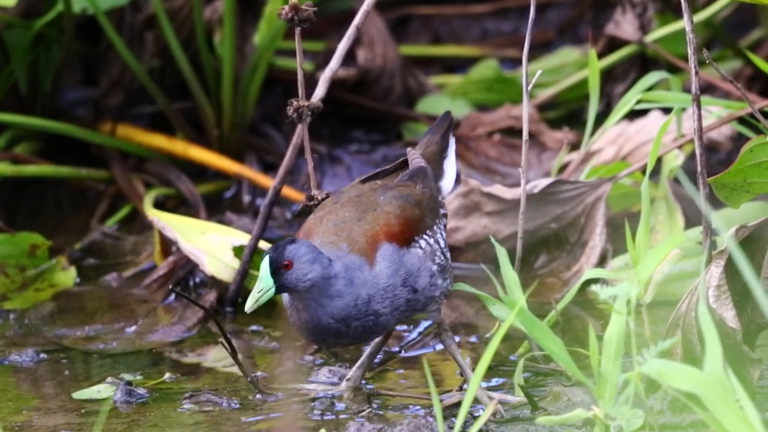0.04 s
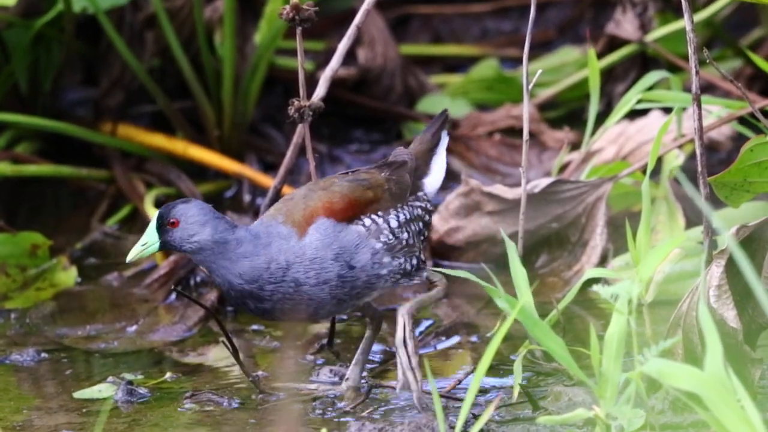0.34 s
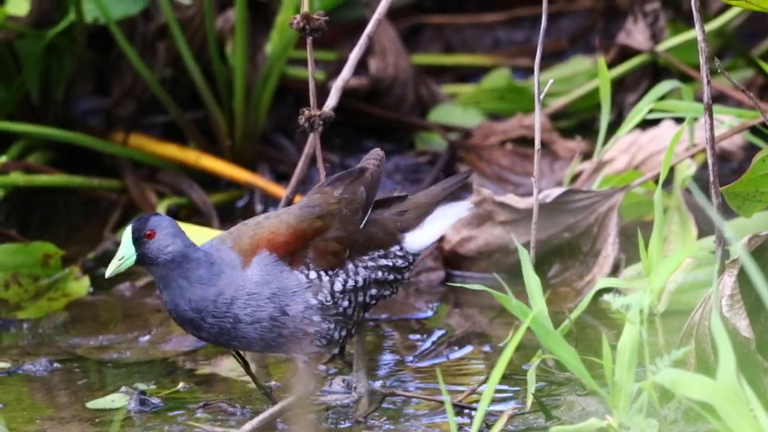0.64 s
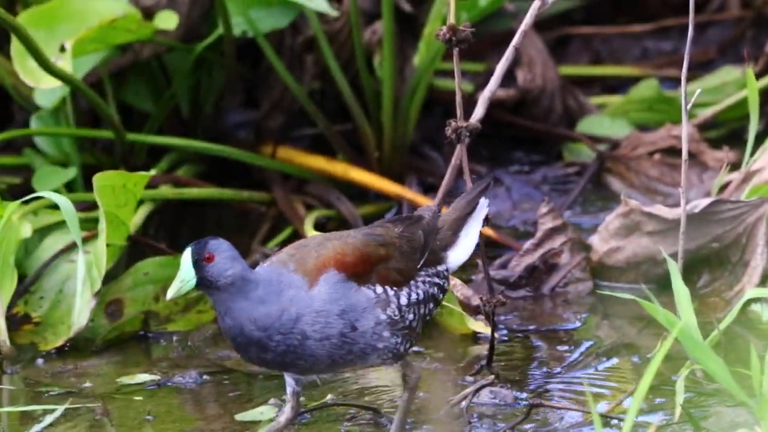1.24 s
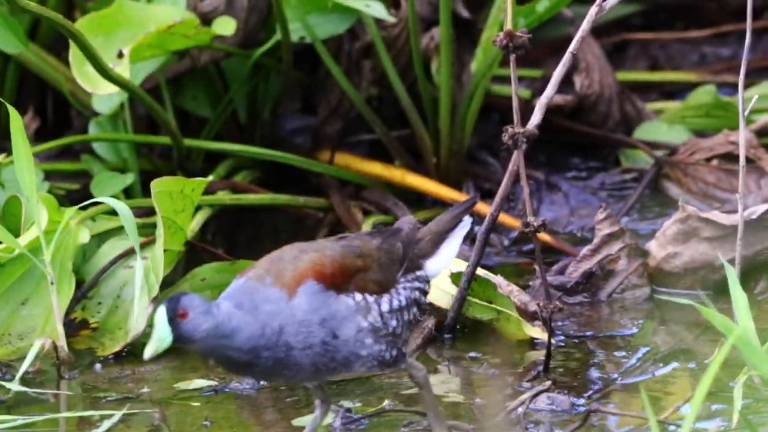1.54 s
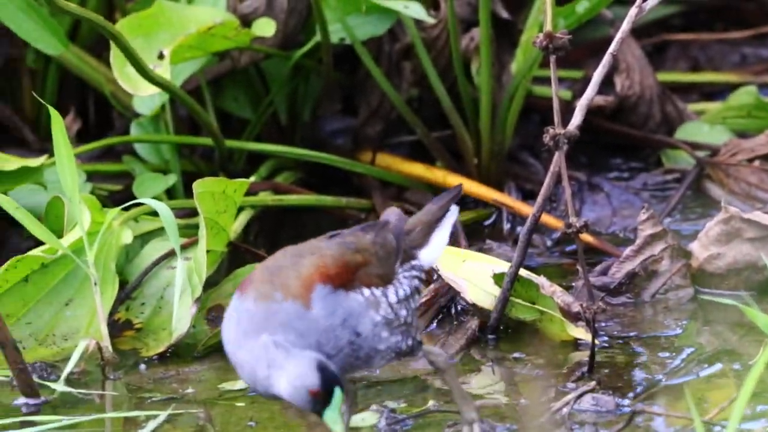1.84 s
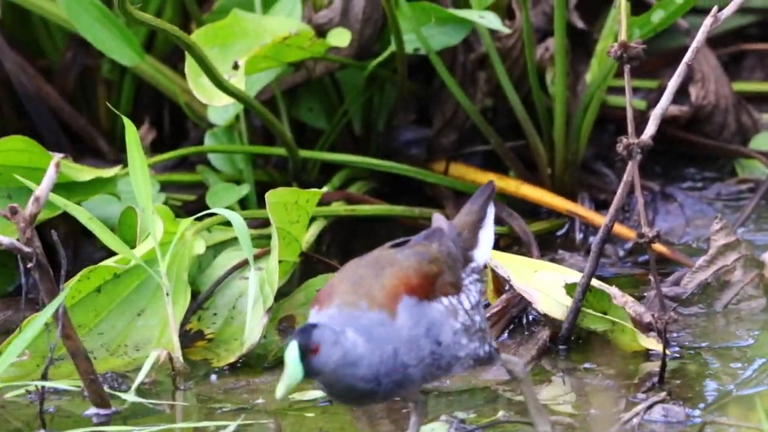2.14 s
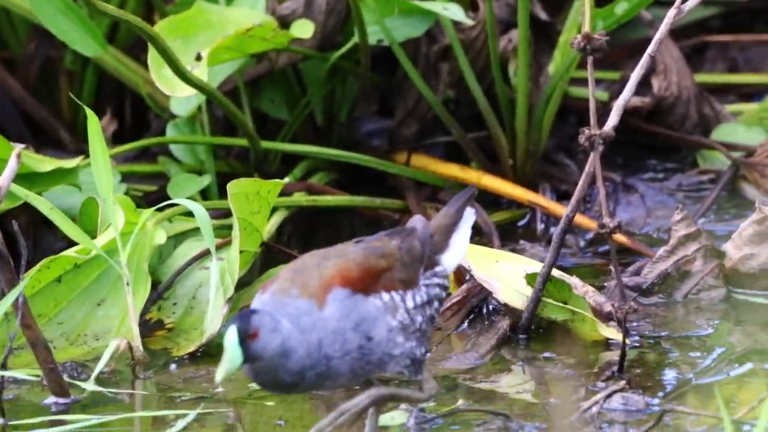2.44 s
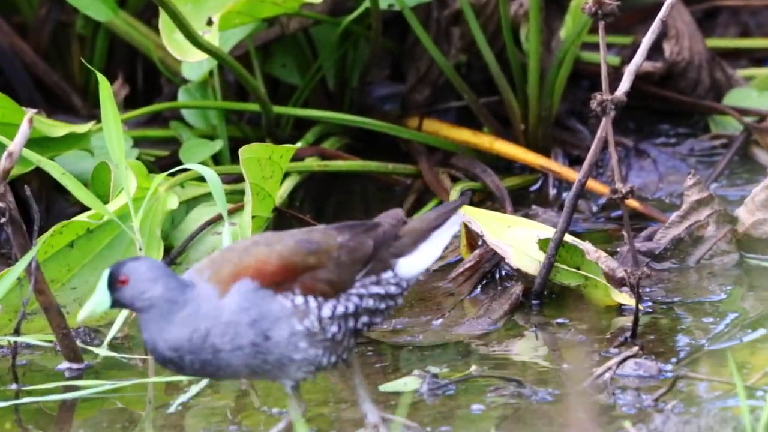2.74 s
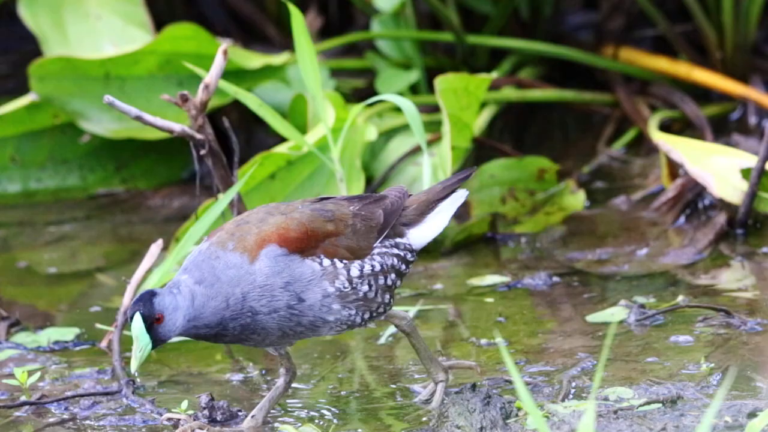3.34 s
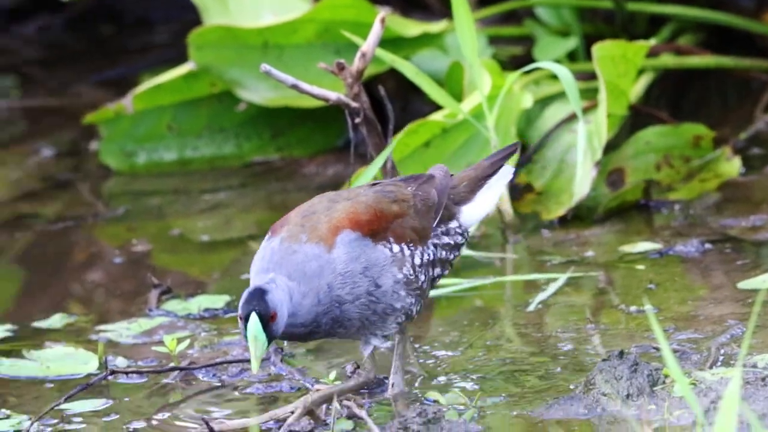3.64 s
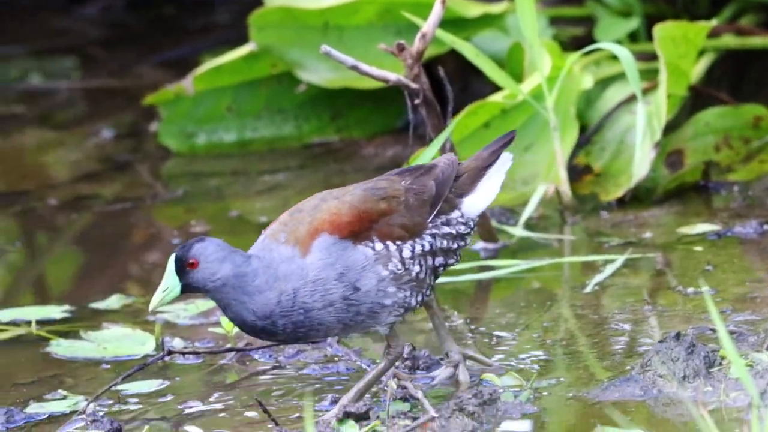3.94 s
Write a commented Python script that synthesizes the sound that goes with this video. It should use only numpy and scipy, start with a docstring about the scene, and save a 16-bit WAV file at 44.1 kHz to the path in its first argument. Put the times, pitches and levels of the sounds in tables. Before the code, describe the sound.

A marsh bird gives seven harsh, clipped calls in the first second. From about 0.9 to 1.7 seconds, seven quick whistles fall in pitch, while water starts ticking and sloshing lightly. Two thin, high peeps follow by 2 seconds. A soft watery wash enters at 2.2 seconds, then eight short, rising clucks run from 2.4 to 4 seconds. Distant birds chirp throughout over faint hiss and rumble.

```python
"""A gallinule wades through a quiet marsh, over a hiss of air and a distant rumble. It opens with harsh
keks, a buzzy tone chopped by a flutter, while faint peeps and small far birds sound behind it. Near 1 s
the keks give way to falling whistles, and water begins to tick and slosh in damped bursts of noise.
Two thin, high peeps follow. From 2.2 s a nearer wash sets in, then soft rising clucks and a faint
low drone. Scattered reflections trail every call."""
import sys
import numpy as np
from scipy import signal
from scipy.fft import rfft, irfft
from scipy.io import wavfile
from scipy.ndimage import uniform_filter1d

SR = 44100
rng = np.random.default_rng(int(sys.argv[2]) if len(sys.argv) > 2 else 0)


def pcm_store(signal):
    """Save signal as 16-bit PCM."""
    levels = np.round(np.clip(np.atleast_2d(signal), -1, 1) * 32767)
    wavfile.write(sys.argv[1], SR, levels.astype(np.int16).T)


N = 176400


def undb(db):
    """Decibels to gain."""
    return 10 ** (np.asarray(db) / 20)


def unit(x):
    """Scale to rms 1."""
    return x / np.sqrt(np.mean(x ** 2) + 1e-18)


def clock(length):
    """Sample times of an event."""
    return np.arange(max(int(length * SR), 16)) / SR


def curve(rows, t, axis=1):
    """Join the rows of a table by straight lines."""
    rows = np.array(rows, float)
    return np.interp(t, rows[:, 0], rows[:, axis])


def add(out, start, x):
    """Mix a sound in at its time."""
    i = int(round(start * SR))
    a, b = max(i, 0), min(i + len(x), N)
    if b > a:
        out[a:b] += x[a - i:b - i]


def colour(x, points, size=4096):
    """Minimum-phase filter of unit power gain through (frequency_hz, relative_db) points."""
    hz, db = np.array(points, float).T
    gain = undb(np.interp(np.log(np.arange(size // 2 + 1) * SR / size + 1), np.log(hz), db))
    cepstrum = irfft(np.log(unit(gain)))
    cepstrum[1:size // 2] *= 2
    cepstrum[size // 2 + 1:] = 0
    return signal.fftconvolve(x, irfft(np.exp(rfft(cepstrum))))[:len(x)]


def noise(points):
    """Coloured noise of rms 1."""
    return colour(rng.standard_normal(N), points)


def walk(rate, size):
    """Random modulation: smoothed random steps with a spread of 1."""
    k = max(int(SR / rate), 2)
    steps = np.repeat(rng.standard_normal(size // k + 2), k)
    return unit(uniform_filter1d(uniform_filter1d(steps, k), k))[:size]


def turns(hz):
    """Phase as the integral of frequency."""
    return 2 * np.pi * np.cumsum(hz) / SR


def echo(x, t60, wet_db):
    """Reverberation: scattered reflections die away exponentially."""
    t = clock(t60)
    envelope = np.exp(-np.log(1000) * t / t60) * np.minimum(t / (t60 / 20), 1)
    tail = unit(rng.standard_normal(len(t)) * envelope) / np.sqrt(len(t))
    return x + undb(wet_db) * signal.fftconvolve(x, tail)[:N]


# Spectra of the air, the treble hiss and the rumble: frequency_hz, relative_db
AIR_SPECTRUM = [(25, -43.5), (100, -27.5), (170, -8), (300, -2), (600, 3), (1000, 1.5), (2300, 0.5),
                (3200, -4), (4400, -6.5), (5500, -19.5), (8000, -21.5), (11000, -28.5), (15500, -42)]
HISS_SPECTRUM = [(3000, -22), (6000, 0), (8000, 3.5), (11000, -11), (15500, -16.5)]
RUMBLE_SPECTRUM = [(20, -15), (36, -14.5), (55, 2), (85, -8), (135, 0.5), (170, -7.5), (270, -1.5),
                   (500, -19.5), (1500, -33)]
# Envelopes of the air and the hiss: time_s, level_db
AIR_ENVELOPE = [(0, -49.5), (.45, -47.5), (.55, -44.5), (.8, -41.5), (1.1, -38), (1.42, -41), (1.5, -44),
                (1.75, -48.5), (1.86, -55.5), (2.08, -42.5), (2.15, -55), (2.6, -51), (4, -43.5)]
HISS_ENVELOPE = [(0, -71), (.48, -77), (.54, -61.5), (.9, -62), (1.5, -66), (1.85, -58), (2.2, -66.5),
                 (2.8, -63), (3.08, -56.5), (3.33, -53), (3.5, -57), (3.68, -52), (4, -56)]


def marsh_air(rumble_db=-58.5):
    """Filtered noise: air and hiss flicker by random amplitude modulation over a steady rumble."""
    t = np.arange(N) / SR
    air = noise(AIR_SPECTRUM) * undb(curve(AIR_ENVELOPE, t) + walk(40, N))
    hiss = noise(HISS_SPECTRUM) * undb(curve(HISS_ENVELOPE, t) + 2.2 * walk(90, N))
    return air + hiss + undb(rumble_db) * noise(RUMBLE_SPECTRUM)


# Thin high notes: start_s, length_s, first_hz, held_hz, slide_s, level_db
PEEPS = [(-.035, 0.18, 8420, 6240, 0.026, -45), (0.212, 0.096, 5320, 4770, 0.021, -41.5),
         (1.68, 0.17, 10640, 6490, 0.02, -33), (1.972, 0.15, 10490, 6450, 0.02, -37)]


def peeps():
    """Exponential glide: a trembling tone swells as it slides down, then holds its pitch."""
    out = np.zeros(N)
    for start, length, first_hz, held_hz, slide, db in PEEPS:
        t = clock(length)
        pitch = held_hz + (first_hz - held_hz) * np.exp(-t / slide)
        phase = turns(pitch * (1 + 0.002 * walk(185, len(t))))
        tone = np.sin(phase) + undb(-30) * np.sin(2 * phase)
        envelope = np.minimum(t / 0.044, 1) ** 2 * np.clip((length - t) / 0.019, 0, 1)
        level_db = db - 4 * t / length + 2.8 * walk(70, len(t))
        add(out, start, np.sqrt(2) * undb(level_db) * envelope * tone)
    return echo(out, t60=1.6, wet_db=-13.5)


FLUTTER_HZ, FLUTTER_DEPTH = 150.1, 0.99
RASP_DECAY_S, CRACK_RISE_S, MARSH_T60_S = 0.093, 0.0012, 0.61
# Harsh calls: start_s, loud_s, length_s, pitch_hz, fall_fraction, level_db, fade_db, tail_db, crack_db
KEKS = [(-.001, 0.063, 0.072, 1133, 0.051, -23, 0.5, -5, -45),
        (0.1641, 0.073, 0.084, 1084, 0.021, -17, -7.5, -0.5, -13.5),
        (0.3474, 0.037, 0.078, 1101, .13, -16, -7.5, -8, -12.5),
        (0.5227, 0.026, 0.047, 982, 0.066, -16, -3, -8, -14.5),
        (0.6808, 0.027, 0.041, 1053, .19, -14, -8.5, -12, -10),
        (0.8373, 0.026, 0.038, 1012, 0.19, -15.5, -6.5, -14.5, -14),
        (1.018, 0.02, 0.038, 956, 0.42, -19.5, -6, -6, -15)]
# Resonances of the bird's throat: frequency_hz, relative_db
THROAT_RESPONSE = [(200, -37.5), (550, -8.5), (900, -4), (1130, -6.5), (1500, 2.5), (1850, -2), (2200, -1),
                   (2600, 3.5), (3200, -7.5), (3750, -17), (4200, -16), (5200, -46.5), (8000, -45),
                   (15000, -65)]


def keks():
    """Source and filter: a buzz, chopped into puffs by a slower flutter, resonates in the throat."""
    out = np.zeros(N)
    for start, loud, length, hz, fall, db, fade_db, tail_db, crack_db in KEKS:
        t = clock(length + 0.03)
        harsh = 1 / (1 + np.exp(np.clip((t - loud) / 0.0048, -50, 50)))  # 1 while loud, 0 in the tail
        rasp = harsh * np.exp(-t / RASP_DECAY_S)
        cycle = np.cumsum(FLUTTER_HZ * (1 + 0.13 * walk(100, len(t)))) / SR
        puff = np.sin(np.pi * (cycle % 1) ** 0.66) ** 0.56
        gate = 1 - FLUTTER_DEPTH * harsh * (1 - puff)
        # Each puff slips in phase by a random amount, roughening the tone.
        slip = uniform_filter1d(rng.standard_normal(64)[cycle.astype(int) % 64], size=40)
        pitch = hz * (1 - fall * (t / length) ** 2) * (1 + 0.034 * rasp * walk(900, len(t)))
        phase = turns(pitch) + 2 * np.pi * 0.12 * rasp * slip
        tilt_db = -5.5 * (1 - harsh + fall)  # per harmonic: tails and falling calls are mellower
        buzz = sum(undb(tilt_db * k) * np.cos((k + 1) * phase) for k in range(8))
        breath = colour(gate * rng.standard_normal(len(t)), THROAT_RESPONSE)
        voice = unit(colour(buzz * gate, THROAT_RESPONSE)) + 0.61 * rasp * breath
        body = undb(fade_db * np.minimum(t / loud, 1)) * (harsh + (1 - harsh) * undb(tail_db))
        edges = np.minimum(t / 0.0024, 1) * np.clip((length - t) / 0.0042, 0, 1)
        add(out, start, undb(db) * voice * body * edges)
        # The opening crack is a brief transient pitched above the call.
        snap = sum(np.cos(k * turns(np.full(len(t), 1.17 * hz))) for k in range(1, 5))
        snap /= np.std(colour(snap, THROAT_RESPONSE))
        burst = (t / CRACK_RISE_S) ** 2 * np.exp(2 - 2 * t / CRACK_RISE_S)
        crack = burst * (snap + 0.5 * rng.standard_normal(len(t)))
        add(out, start, undb(crack_db) * colour(crack, THROAT_RESPONSE))
    return echo(out, MARSH_T60_S, wet_db=-23)


# Calls from deeper in the marsh: start_s, length_s, first_hz, last_hz, level_db, waver_fraction
FAR_CALLS = [(0.072, 0.074, 2250, 2350, -49, 0.035), (.15, 0.035, 9700, 9000, -59.5, 0.016),
             (0.398, 0.056, 3540, 4100, -46, .004), (0.462, 0.05, 8430, 5460, -55, 0.078),
             (0.637, 0.066, 3450, 3660, -50, 0.0043), (1.363, 0.085, 2160, 2260, -45.5, .02),
             (1.437, 0.1, 2570, 2385, -49.5, 0.011), (1.683, 0.047, 2050, 2150, -41.5, 0.03),
             (1.715, 0.048, 2524, 2360, -49, 0.011), (2.041, 0.052, 2444, 2380, -53, 0.0068),
             (2.464, 0.023, 2640, 2554, -33.5, 0.0093), (2.489, 0.043, 2550, 2450, -30.5, 0.0044),
             (2.519, 0.1, 2433, 2175, -36.5, 0.022), (2.634, 0.093, 2030, 1866, -48.5, .008),
             (2.607, 0.042, 8760, 8570, -59, .004), (2.809, 0.039, 6340, 5900, -53.5, 0.042),
             (2.918, 0.071, 7520, 9360, -53.5, 0.019), (2.976, 0.055, 4520, 4280, -44.5, 0.0065),
             (3.151, 0.064, 4570, 4210, -45, 0.0035), (3.65, 0.17, 2520, 2440, -40, .07)]


def far_birds():
    """Scattering: short wavering glides arrive blurred by early reflections and reverberation."""
    out = np.zeros(N)
    for start, length, first_hz, last_hz, db, waver in FAR_CALLS:
        t = clock(length)
        pitch = np.linspace(first_hz, last_hz, len(t)) * (1 + waver * walk(350, len(t)))
        envelope = undb(db + 3 * walk(115, len(t))) * np.abs(np.sin(np.pi * t / length)) ** 0.5
        add(out, start, np.sqrt(2) * envelope * np.sin(turns(pitch)))
    scattered = echo(out, t60=0.07, wet_db=-5)
    return echo(scattered, MARSH_T60_S, wet_db=-10.5)


# Falling whistles: start_s, level_db
WHISTLES = [(.890, -26.5), (1.024, -26), (1.149, -25), (1.272, -25.5), (1.395, -25.5), (1.520, -25.5),
            (1.649, -25.5)]
# Their common contour: time_s, pitch_hz, relative_db
WHISTLE_CONTOUR = [(0, 7550, -46), (.003, 7240, -10.5), (.005, 5990, -24), (.010, 5495, -7.5),
                   (.020, 4766, 0), (.030, 4307, -1), (.040, 3760, -0.5), (.055, 3173, -4.5),
                   (.066, 2990, -10), (.078, 3010, -23)]
# Spectrum of their airy edge: frequency_hz, relative_db
BREATH_SPECTRUM = [(2000, -36), (5000, 0), (8000, -2), (11000, -2), (15500, -24)]


def whistles():
    """Frequency sweep: nearly pure tones fall over an octave and reflect off the ground."""
    out = np.zeros(N)
    t = clock(WHISTLE_CONTOUR[-1][0])
    for start, db in WHISTLES:
        phase = turns(curve(WHISTLE_CONTOUR, t) * (1 + 0.0077 * walk(390, len(t))))
        breath = colour(rng.standard_normal(len(t)), BREATH_SPECTRUM)
        tone = np.sin(phase) + undb(-30) * np.sin(2 * phase) + undb(-33) * breath
        level_db = db + curve(WHISTLE_CONTOUR, t, axis=2) + 1.33 * walk(254, len(t))
        add(out, start, np.sqrt(2) * undb(level_db) * tone)
    off_ground = echo(out, t60=0.05, wet_db=-8.5)
    return echo(off_ground, MARSH_T60_S, wet_db=-19)


# Ticks and small splashes: start_s, relative_db, low_band_offset_db
SPLASHES = [(0.9124, -36.5, 0), (0.9895, -37, -10), (1.036, -29, 8), (1.0504, -34.5, -11), (1.2181, -36, 5),
            (1.245, -38, 4), (1.2645, -44, 7), (1.3274, -37, -9), (1.3738, -29.5, 2), (1.3857, -33.5, 3),
            (1.4722, -41, 4.5), (1.5787, -39, 10), (1.6, -41, 3), (1.664, -36.5, 3.5), (1.7097, -32, 3.5),
            (1.7224, -32.5, 3.5), (1.912, -48.5, 15), (1.9236, -43, 9), (1.9328, -39.5, 3),
            (1.9516, -47, 10), (1.9973, -34, -2), (2.0443, -27.5, 0.5), (2.0562, -35, 1), (2.0715, -39, -7),
            (2.093, -47, -6), (3.201, -35.5, 4), (3.216, -41, 6), (3.2545, -37.5, 10), (3.275, -36, 3),
            (3.3202, -30, 3), (3.3315, -33.5, 3), (3.5285, -35.5, 6.5), (3.548, -39, -1),
            (3.6118, -34.5, -8), (3.6275, -33.5, 1), (3.6594, -28, 1), (3.6734, -35, 6.5),
            (3.7818, -55, -3), (3.866, -34, 1.5), (3.946, -34.5, 3), (3.9954, -28, 2)]
# Spectra of their two bands: frequency_hz, relative_db
SPLASH_HIGH_BAND = [(300, -55), (2000, -21), (5000, 3), (8000, 9.5), (11000, -1.5), (15500, -17)]
SPLASH_LOW_BAND = [(100, -47), (400, -24), (900, 6.5), (3500, 7), (6000, -7.5), (12000, -19.5)]


def splashes(drip_count=30, drips_from_s=1):
    """Broadband transients: water ticks in two bands of noise, with faint random drips in the upper."""
    high, low, out = np.zeros((3, N))
    t = clock(0.2)
    splash = np.minimum(t / 0.0015, 1) * np.exp(-np.maximum(t - 0.0025, 0) / 0.0033)
    for start, db, low_db in SPLASHES:
        add(high, start, undb(db - 4) * splash)
        add(low, start, undb(db + low_db - 2) * splash)
    for when, faintness in rng.random((drip_count, 2)):
        start = drips_from_s + when * (N / SR - drips_from_s)
        add(high, start, undb(-44 - 16 * faintness) * np.exp(-t / 0.0017))
    for envelope, band in (high, SPLASH_HIGH_BAND), (low, SPLASH_LOW_BAND):
        crackle = rng.standard_normal(N) * undb(1.5 * walk(1200, N))
        out += colour(envelope * crackle, band)
    return out


# Sloshes of water: start_s, decay_s, level_db
SLOSHES = [(1.221, 0.021, -35.5), (1.374, 0.01, -43), (1.523, 0.0047, -33.5), (1.594, 0.013, -34),
           (1.821, 0.0064, -40), (1.916, 0.027, -42.5), (1.989, 0.0086, -37.5), (2.048, 0.014, -61),
           (1.835, 0.0034, -47), (2.222, 0.025, -43), (2.611, 0.0093, -31), (2.708, 0.039, -25.5),
           (2.745, 0.04, -27.5), (2.832, 0.042, -28), (2.868, 0.0048, -27.5), (3.963, 0.011, -20.5)]
# Their dull spectrum: frequency_hz, relative_db
SLOSH_SPECTRUM = [(200, -34.5), (480, -32.5), (600, 8), (900, 3), (1400, -8.5), (2500, -20), (5000, -29.5),
                  (15000, -52)]


def sloshes():
    """Exponential decay: each slosh is a damped burst of noise, strongest near 600 Hz."""
    envelope = np.zeros(N)
    t = clock(0.2)
    for start, decay, db in SLOSHES:
        burst = np.minimum(t / 0.0017, 1) * np.exp(-np.maximum(t - 0.003, 0) / decay)
        add(envelope, start - 0.002, undb(db) * burst)
    return colour(envelope * rng.standard_normal(N), SLOSH_SPECTRUM)


# Spectrum of the nearer wash: frequency_hz, relative_db
WASH_SPECTRUM = [(100, -36), (470, -39.5), (540, -11), (610, 4.5), (720, 0.5), (900, -4.5), (1300, -9),
                 (1900, -15), (2500, -12), (3300, -17), (4300, -16), (5300, -34.5), (7000, -44),
                 (8400, -48), (11000, -44), (15500, -51)]


def wash(start_s=2.21, level_db=-36.5):
    """Gated noise: a flickering midrange wash sets in just before the clucks and stays."""
    onset = np.clip((np.arange(N) / SR - start_s) / 0.004, 0, 1)
    return noise(WASH_SPECTRUM) * undb(level_db + walk(40, N)) * onset


# Soft round notes: start_s, swell_s, length_s, first_hz, level_db
CLUCKS = [(2.440, 0.0086, 0.022, 621, -21.5), (2.649, 0.015, 0.035, 599, -20),
          (2.727, 0.0076, 0.022, 625, -19.5), (2.951, 0.014, 0.034, 605.5, -19),
          (3.246, .015, 0.031, 614, -20), (3.514, .011, .028, 639, -19), (3.715, 0.017, 0.043, 607.5, -16),
          (3.899, 0.018, 0.047, 633.4, -15)]


def clucks(rise_fraction=0.582, fade_db=-24):
    """Phase modulation: a rising tone gains husky, jittering second and third harmonics as it fades."""
    out = np.zeros(N)
    for start, swell, length, hz, db in CLUCKS:
        t = clock(length)
        late = np.clip((t - swell) / (length - swell), 0, 1)
        pitch = hz * (1 + rise_fraction * (t / length) ** 2.05)
        phase = turns(pitch * (1 + 0.0054 * walk(276, len(t))))
        attack = np.sin(np.pi / 2 * np.minimum(t / swell, 1)) ** 1.14
        fade = undb(fade_db * late ** 2 + 4.5 * late * walk(288, len(t)))
        release = np.clip((length - t) / 0.0011, 0, 1)
        husky_phase = phase + 0.5 * walk(500, len(t))
        overtones = np.sin(2 * husky_phase) + 0.46 * np.sin(3 * husky_phase)
        tone = np.sin(phase) + late * undb(-5.5) * overtones
        add(out, start, np.sqrt(2) * undb(db) * attack * fade * release * tone)
    return echo(out, t60=0.21, wet_db=-16)


# Envelope of the low drone: time_s, level_db
DRONE_ENVELOPE = [(0, -100), (2.5, -73.5), (2.9, -56.5), (3.4, -63.5), (4, -60)]


def drone(pitch_hz=167):
    """Slow random modulation: a faint sinusoid emerges late, wavering in pitch and level."""
    phase = turns(pitch_hz * (1 + 0.02 * walk(25.07, N)))
    level_db = curve(DRONE_ENVELOPE, np.arange(N) / SR) + 1.5 * walk(9, N)
    return np.sqrt(2) * undb(level_db) * np.sin(phase)


def scene():
    """Superposition: air, birds and water add at one listening point."""
    return (marsh_air() + peeps() + keks() + far_birds() + whistles()
            + splashes() + sloshes() + wash() + clucks() + drone())[None]


def record(dry, cutoff_hz=15800):
    """Band limiting: a steep low-pass filter removes the highest treble."""
    return signal.sosfilt(signal.ellip(10, 0.2, 80, cutoff_hz, fs=SR, output="sos"), dry)


dry = scene()
out = record(dry)
pcm_store(out)
```